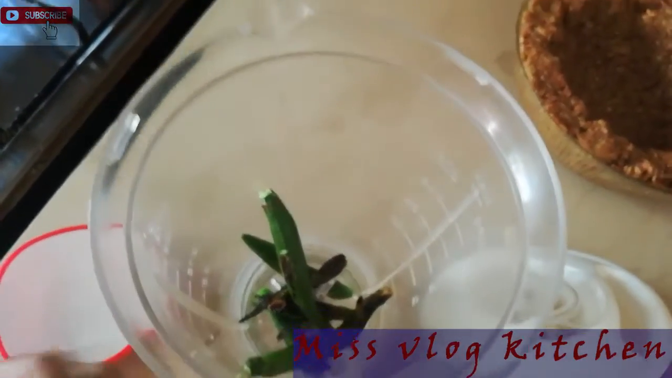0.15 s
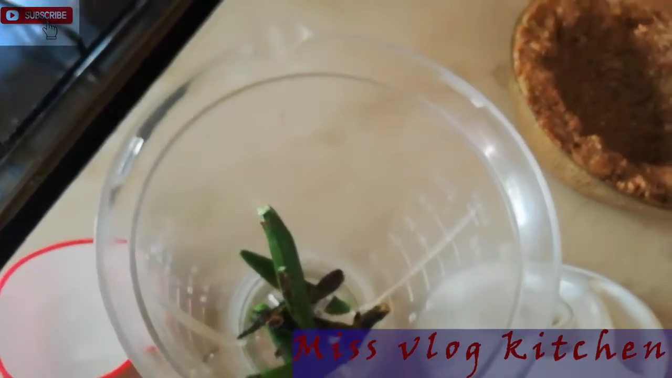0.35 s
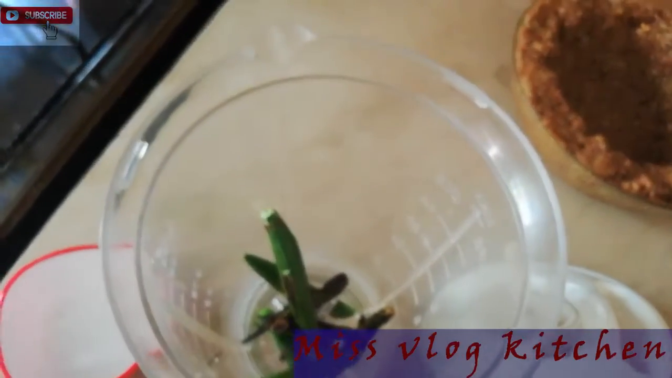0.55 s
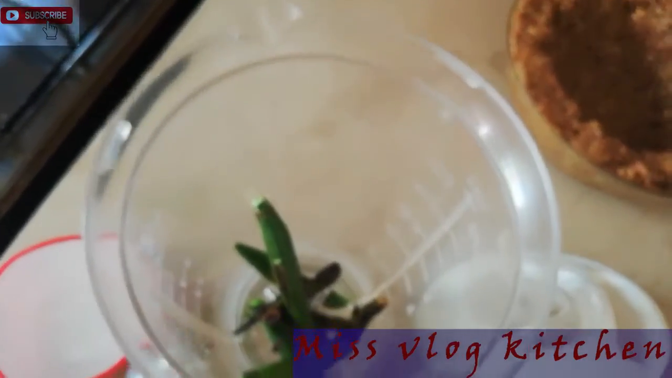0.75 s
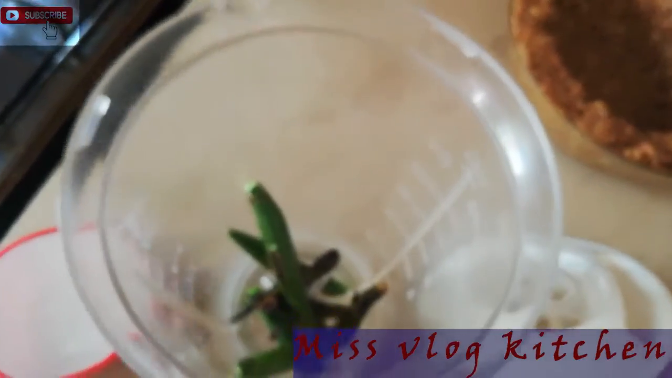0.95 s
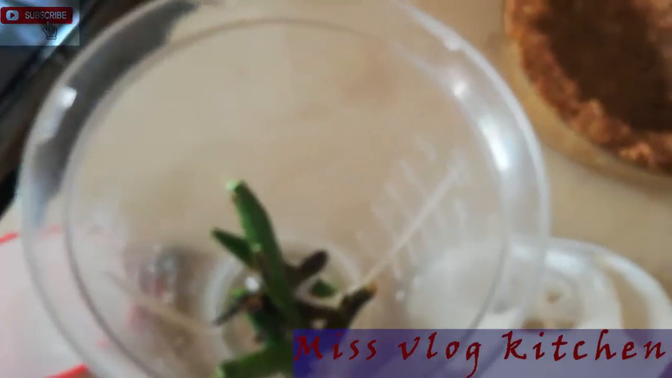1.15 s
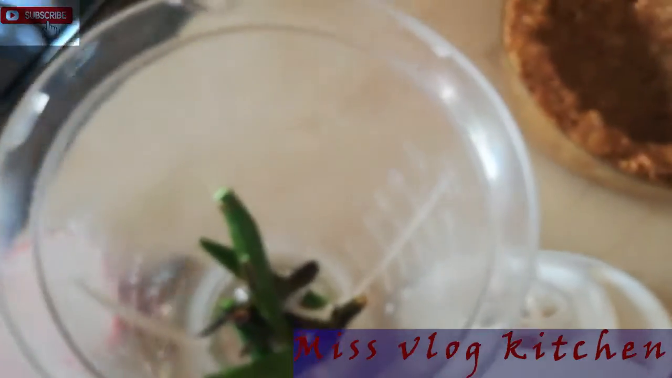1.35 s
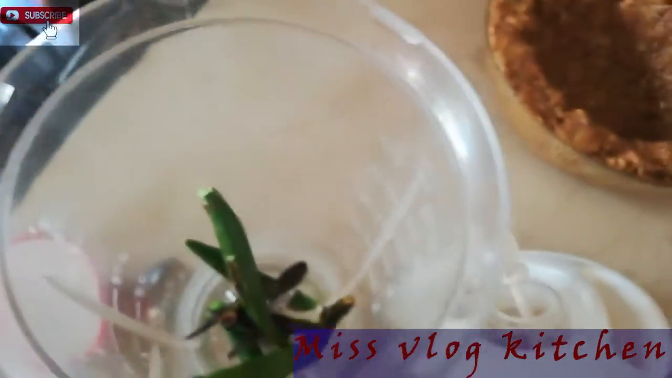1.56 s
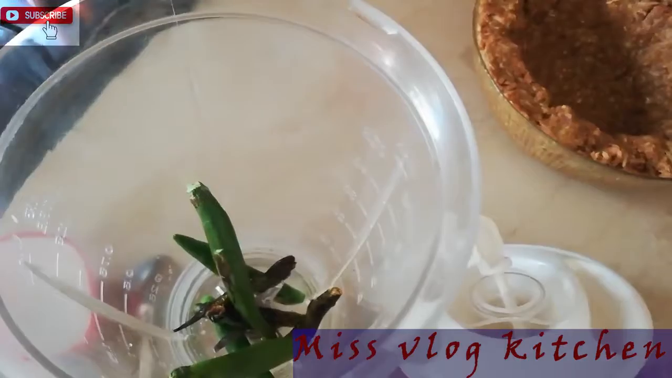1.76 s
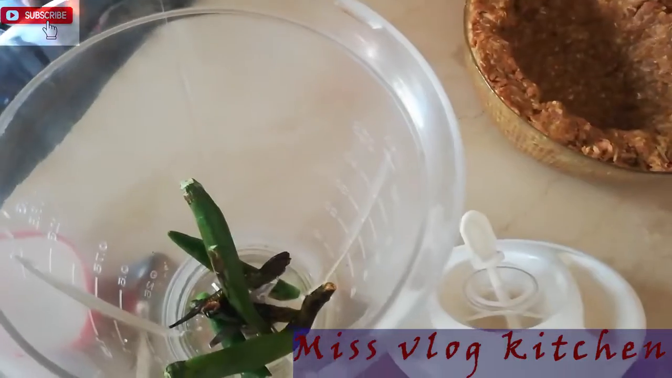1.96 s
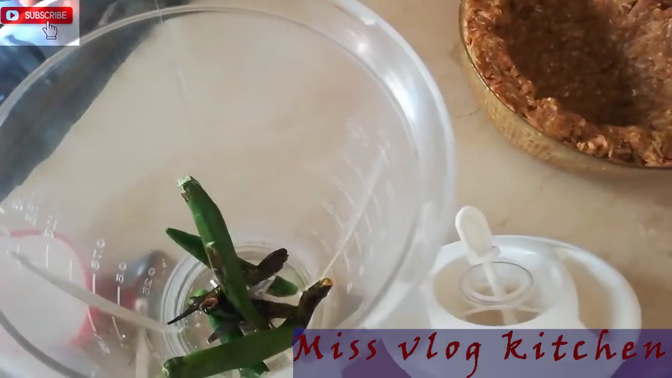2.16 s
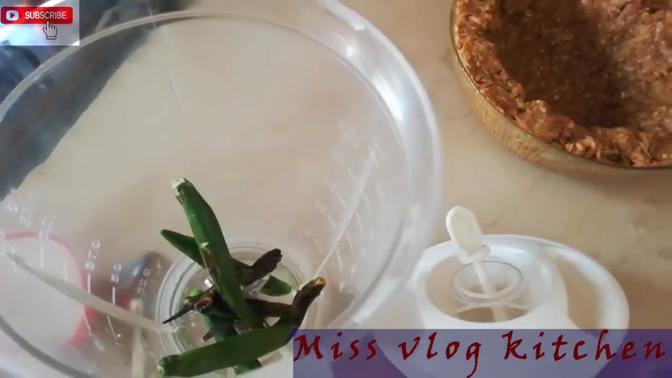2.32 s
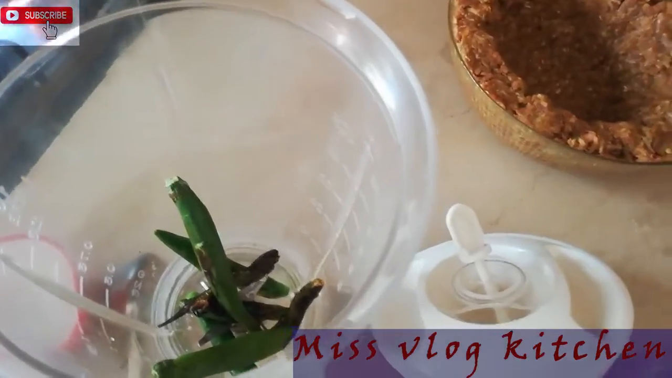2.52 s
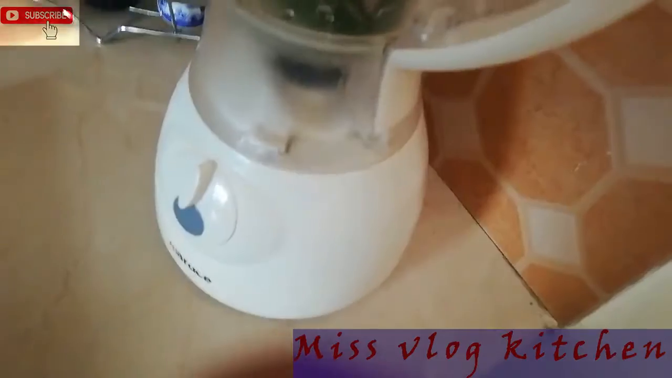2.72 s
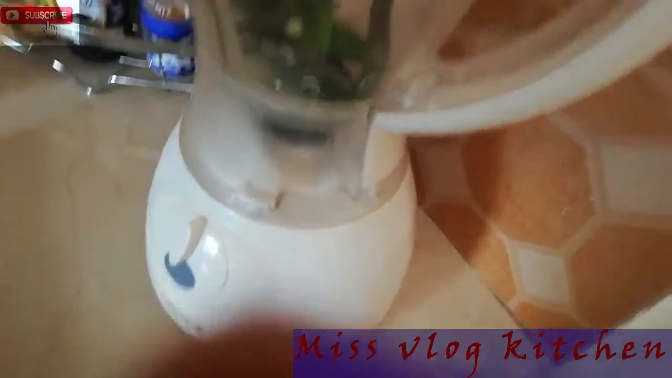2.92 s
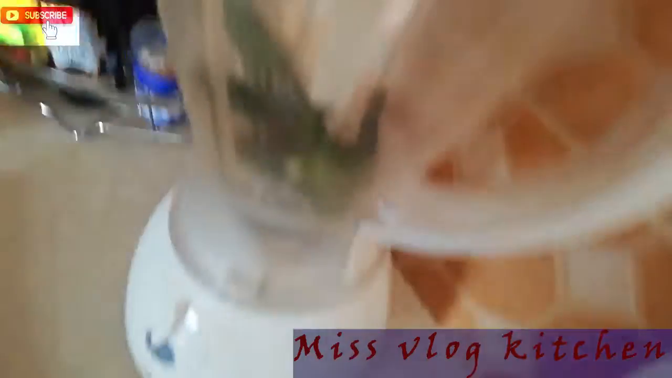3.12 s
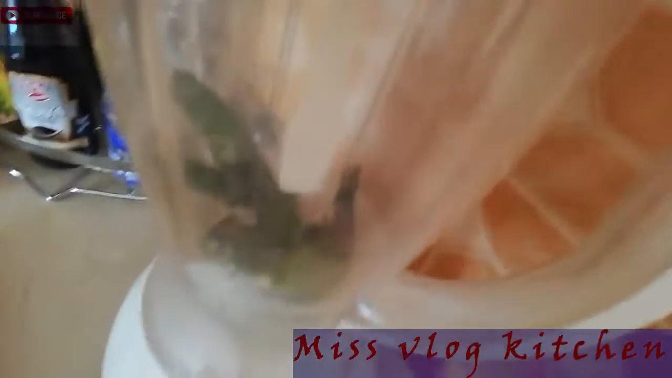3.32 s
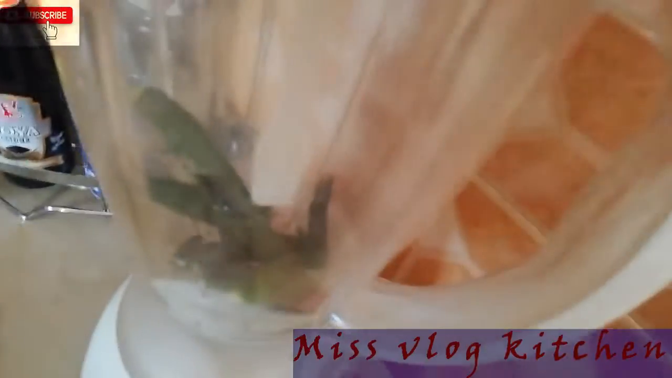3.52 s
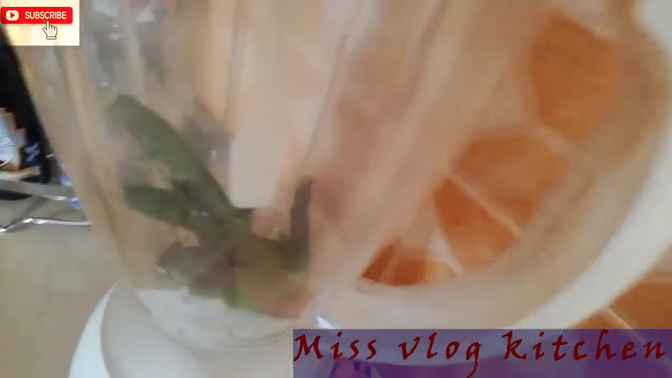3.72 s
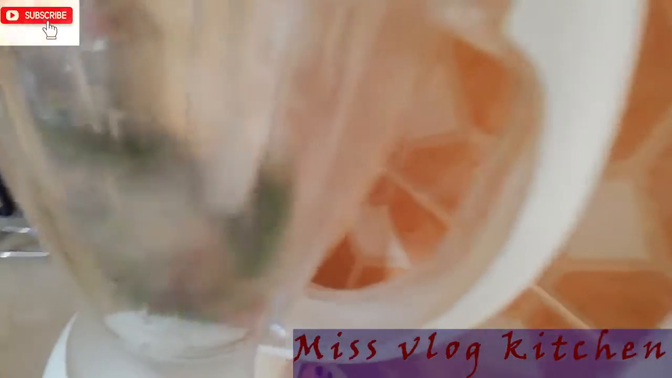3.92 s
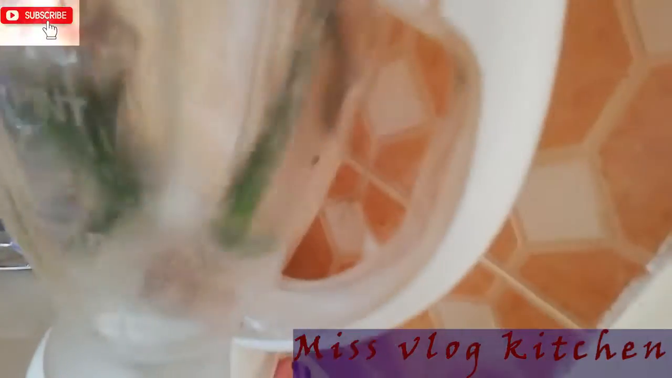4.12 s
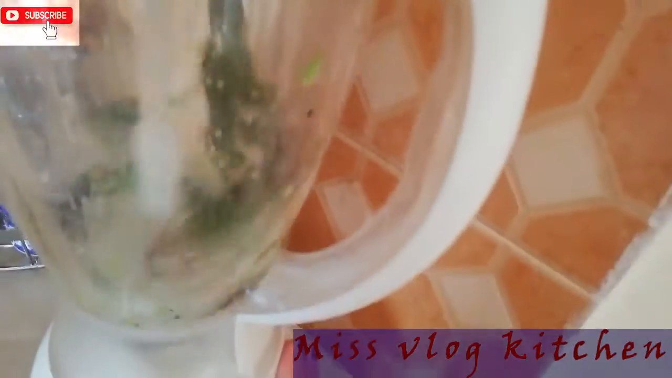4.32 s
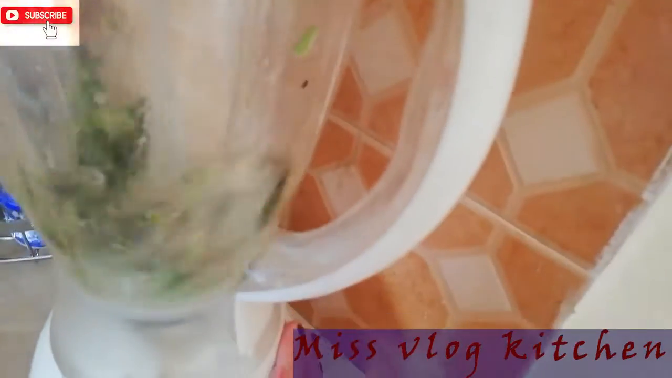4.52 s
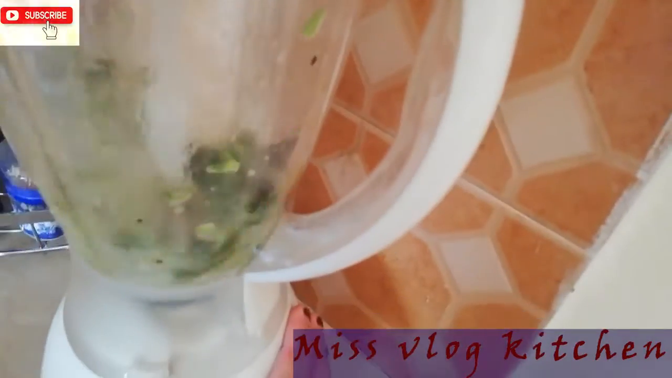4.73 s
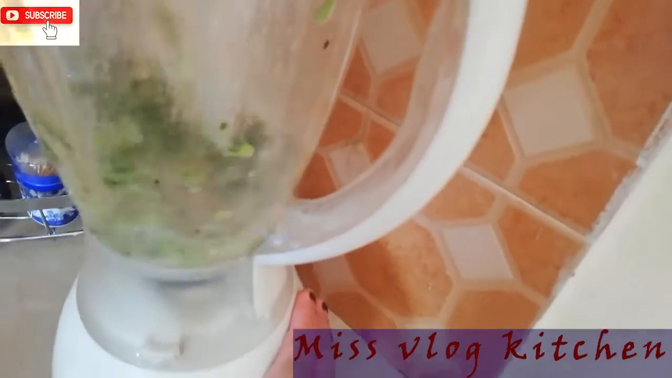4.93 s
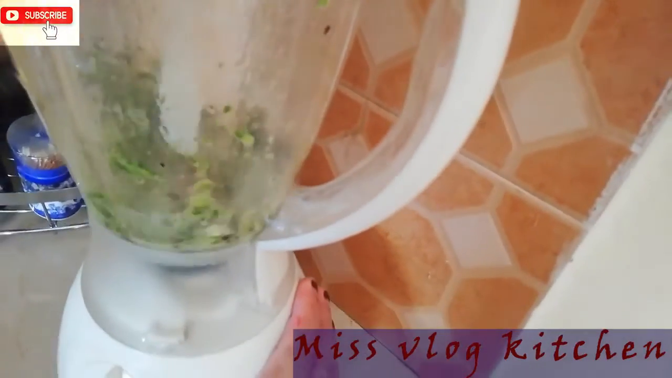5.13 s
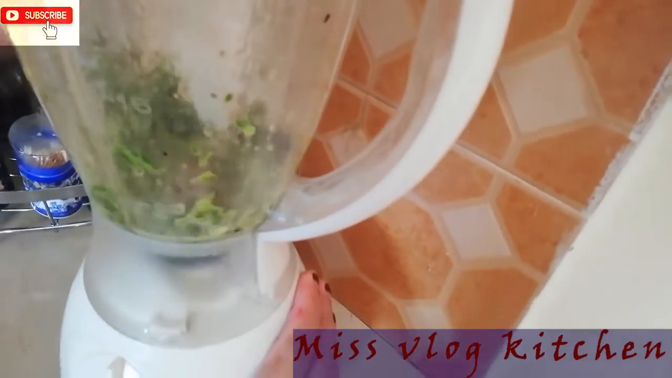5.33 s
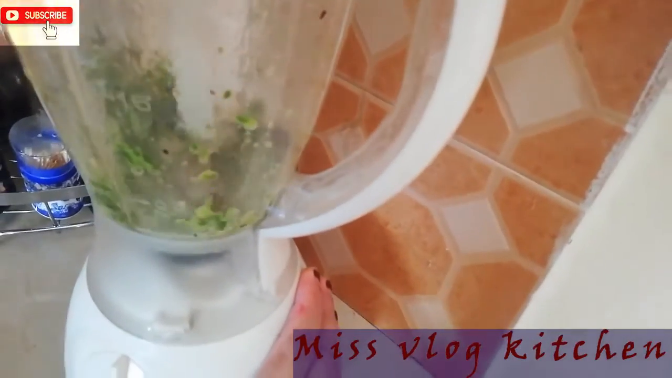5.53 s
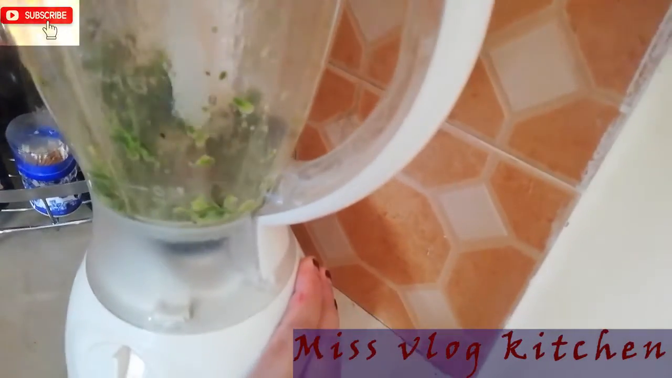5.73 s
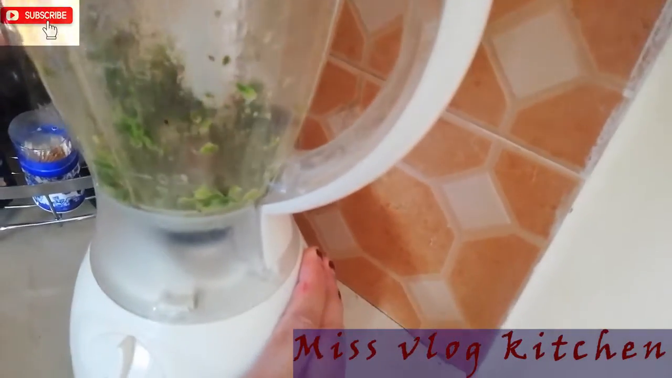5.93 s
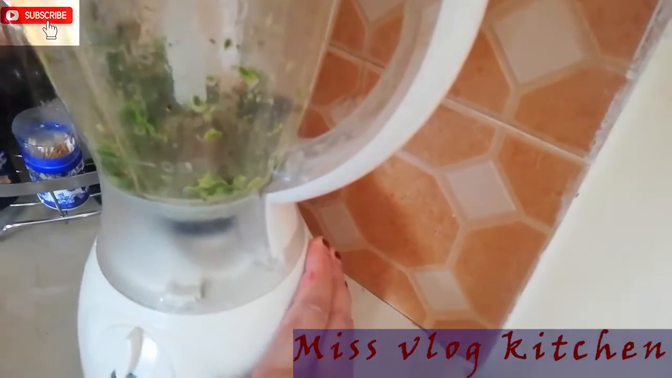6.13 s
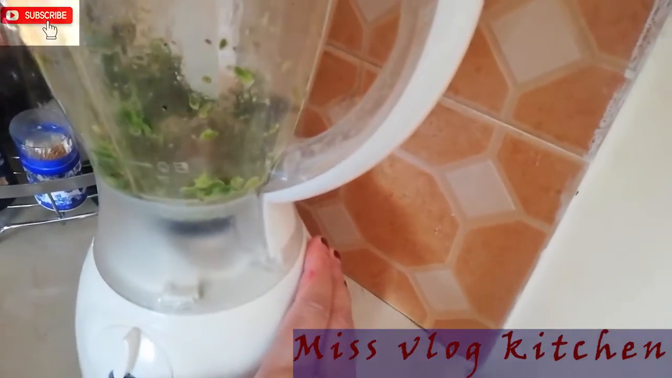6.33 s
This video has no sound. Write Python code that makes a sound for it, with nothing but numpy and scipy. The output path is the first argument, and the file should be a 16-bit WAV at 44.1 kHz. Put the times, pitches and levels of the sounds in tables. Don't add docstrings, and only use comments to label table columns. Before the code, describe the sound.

A quiet kitchen with low, wavering fridge hum and soft room air, heard close in stereo, right side nearer. At 0.0 s a hollow plastic jug knock, then skin rubs and scrapes against plastic and worktop, strongest around 0.4 and 0.6 s. At 1.0 s a small steel part lands with a sharp click and tiny bounces; from 1.24 to about 1.55 s it rattles brightly with plastic knocks and settles. Faint rubbing follows until the place changes abruptly at 2.6 s, hum a little fuller, with more handling strokes to 3.8 s. At 3.92 s the blender starts with thuds, loud and rough, pieces cracking irregularly against blade and jug as speed climbs. After about 5.0 s chopping thins into a smoother, hissing, whining roar, peaking near 5.8 s. Switched off at 6.05 s, its pitch slides down, the lid buzzing, still turning at 6.37 s.

```python
import sys
import numpy as np
from scipy import signal
from scipy.fft import rfft, irfft
from scipy.io import wavfile
from scipy.ndimage import uniform_filter1d

SR = 44100
rng = np.random.default_rng(int(sys.argv[2]) if len(sys.argv) > 2 else 0)


def store_wav(level_fs):
    pcm = np.round(np.clip(np.atleast_2d(level_fs), -1, 1) * 32767)
    wavfile.write(sys.argv[1], SR, pcm.T.astype(np.int16))


def elevation(decibels):
    levels = np.asarray(decibels, float)
    return 10 ** (levels / 20)


N = 280917
T = np.arange(N) / SR
HZ = np.fft.rfftfreq(N, 1 / SR)

# start_s [s], turns_per_s [Hz]
SHAFT_SPEED = [(3.914, 142), (4.06, 182), (4.2, 193), (4.42, 201.5), (4.55, 203.4), (4.95, 212), (5.2, 216),
               (5.54, 220.5), (5.8, 225), (6.04, 222), (6.37, 155)]
# pitch_hz [Hz], first_place_db [dB], second_place_db [dB]
MAINS_HUM = [(100.8, -2.5, -0.5), (48.7, -17, -14.5), (146, -32, -6), (257, -45, -18.5), (1393, -40, -12)]
START_S, OFF_S = SHAFT_SPEED[0][0], 6.05
MOVE_S = 2.585
FULL_HZ = 226
MAINS_HZ = MAINS_HUM[0][0]


def evened(x):
    return x / np.sqrt(np.mean(x ** 2) + 1e-20)


def read(points, hz=HZ):
    f, value = np.transpose(points)
    return np.interp(np.log(hz + 1), np.log(f + 1), value)


def coloured(x, points):
    return evened(irfft(rfft(x) * elevation(read(points)), N))


def resonate(x, hz, width):
    spin = np.exp(2j * np.pi * np.cumsum(hz * np.ones(N)) / SR)
    r = np.exp(-np.pi * width / SR)
    smooth = signal.lfilter([(1 - r) ** 2], [1, -2 * r, r * r], x / spin)
    return 2 * (spin * smooth).real


def bank(x, peaks):
    return evened(sum(elevation(db) * evened(resonate(x, hz, width)) for hz, width, db in peaks))


def grit(per_s, spread_db, smooth):
    size = elevation(spread_db * np.minimum(rng.exponential(1, N), 5)) * (rng.random(N) < per_s / SR)
    clicks = evened(size * rng.choice([-1., 1.], N))
    return evened(clicks + smooth * rng.standard_normal(N))


def drift(seconds):
    size = int(seconds * SR)
    once = uniform_filter1d(rng.standard_normal(N), size=size)
    return evened(uniform_filter1d(once, size=size))


def ring(modes, seconds=.5):
    t = T[:int(seconds * SR)]
    return sum(elevation(db - 60 * t / t60) * np.sin(2 * np.pi * hz * t) for hz, db, t60 in modes)


def train(blows):
    out = np.zeros(N)
    for s, db in blows:
        out[round(s * SR)] += elevation(db)
    return out


def answer(drive, response):
    return signal.fftconvolve(drive, response)[:N]


def shaft():
    # start_s [s], share [0-1]
    pieces = [(3.92, 0.98), (4.9, 0.97), (5.2, 0.17), (6.37, 0.17)]
    steady = np.interp(T, *np.transpose(SHAFT_SPEED))
    speed = steady * (1 + 0.0027 * drift(0.015))
    turns = 2 * np.pi * np.cumsum(speed) / SR
    load = np.clip(np.interp(T, *np.transpose(pieces)), 0, 1)
    coast = np.clip((T - OFF_S) / 0.03, 0, 1)
    return steady, speed, turns, load, coast


def shaft_tones(steady, speed, turns, coast):
    orders = [2, 3, 4, 5, 6, 7, 8, 9, 10, 13, 20, 24]
    # power_db [dB], coast_db [dB]
    order_levels = [(-47, -49), (-44, -49), (-34, -45), (-36, -38), (-38.5, -36.5), (-35.5, -46),
                    (-40, -44), (-33.5, -43), (-36, -34), (-38, -40), (-55, -59), (-42.5, -53)]
    lost_hz = FULL_HZ - steady
    held_db = np.maximum(FULL_HZ - speed, 0) * 0.37
    jammed = np.clip(.5 - (T - 4.38) / 0.052, 0, 1)
    tone_db = -31.5 - (0.17 - 0.04 * coast) * lost_hz - 12 * jammed + 1.36 * drift(0.027)
    buzz_db = -38 - 0.3 * lost_hz - 7 * coast
    out = elevation(tone_db) * np.sin(turns) + elevation(buzz_db) * np.sin(2 * np.pi * MAINS_HZ * T)
    for k, (power_db, coast_db) in zip(orders, order_levels):
        swell_db = 4 * np.exp(-((k * steady - 1040) / 550) ** 2)
        order_db = (1 - coast) * (power_db - held_db) + coast * (coast_db + swell_db)
        out += elevation(order_db + 2.5 * drift(0.035)) * np.sin(k * turns + 6 * rng.random())
    return np.sqrt(2) * out


def brushes(speed, load, coast):
    bar_orders = [36, 37, 42, 48, 60]
    # level_db [dB], width_hz [Hz]
    bar_levels = [(-39, 84), (-39, 150), (-41, 120), (-37, 82.6), (-46, 130)]
    noise = rng.standard_normal(N)
    whine = sum(elevation(db) * evened(resonate(noise, k * speed, width))
                for k, (db, width) in zip(bar_orders, bar_levels))
    throb = 1 + .5 * np.sin(2 * np.pi * MAINS_HZ * T)
    spark_db = 5.5 - 23 * load - 16 * coast
    return elevation(spark_db) * throb * whine


def lid_buzz(strikes, steady, coast):
    nearness = np.exp(-((steady - 171.2) / 14.5) ** 2)
    return elevation(-36.5) * nearness * coast * evened(resonate(strikes, 3470, 188))


def chopping(steady, turns, load, coast):
    # peak_s [s], level_db [dB], half_length_s [s]
    bites = [(3.936, 9, 0.054), (4.017, 8, 0.058), (4.162, 11.5, 0.098), (4.233, 9, 0.026),
             (4.355, 5, 0.066), (4.457, 9, 0.0357), (4.511, 9.5, 0.043), (4.6, 6.5, 0.066),
             (4.681, 9.5, 0.056), (4.757, 9.5, 0.0294), (4.84, 8, 0.075), (4.936, 3.5, 0.072),
             (5.025, 6, 0.044), (5.07, 1.5, 0.025), (5.266, 2.5, 0.054), (5.42, 2, 0.042), (6.297, 4, 0.16)]
    # start_s [s], peak_db [dB]
    single_cuts = [(3.9193, -23), (3.9243, -14), (3.9463, -15), (3.983, -5), (4.0246, -15), (4.0396, -6.5),
                   (4.086, -9), (4.1304, -6.5), (4.1927, -11), (4.224, -8), (4.296, -19), (4.3094, -8),
                   (4.331, -7), (4.363, -7.5), (4.4362, -18), (4.4526, -8.5), (4.494, -8), (4.5564, -10),
                   (4.5795, -8), (4.6601, -15), (4.6712, -7), (4.7163, -11), (4.7528, -10), (4.8211, -10),
                   (4.8835, -9), (4.9181, -10.5), (4.99, -19), (5.0049, -13), (5.0528, -6), (5.0734, -8),
                   (5.1944, -19), (5.2762, -20), (5.3345, -29), (5.376, -12), (5.4204, -6), (5.4853, -20)]
    # free_db [dB], slow_db [dB per lost turn a second], bite_share [1], coast_db [dB]
    layers = [
        (-21, 0.0055, 0.581, -3.5),
        (-28.5, 0.0134, 0.85, -1.5),
        (-24.5, 0.1249, 0.68, 2),
    ]
    brake_levels = [-2.5, -1, -2.5]
    # pitch_hz [Hz], level_db [dB per Hz]
    housing_spectrum = [(350, -35.5), (600, -12), (707, -18), (903, -7.5), (1430, -5.5), (1540, -5),
                        (2090, -3), (2400, -9), (2700, -7.5), (3510, -19), (5940, -120)]
    # pitch_hz [Hz], width_hz [Hz], level_db [dB]
    housing_rings = [(911, 68, -6), (1028, 170, -7.5), (1569, 47, -0.5), (2022, 150, -0.5),
                     (2146, 190, -2.5), (2585, 53, -11), (2842, 140, -9.5)]
    # pitch_hz [Hz], level_db [dB per Hz]
    blade_spectrum = [(1410, -38.5), (2400, -17.5), (2880, -8.5), (3140, -4), (3890, -0.5), (4700, -3),
                      (5800, -8.5), (6600, -16), (13200, -88)]
    # pitch_hz [Hz], level_db [dB per Hz]
    hiss_spectrum = [(3120, -41), (5300, -8.5), (6980, -3), (8030, 0.5), (8780, -0.5), (10500, -2),
                     (13000, -9), (15200, -19), (16200, -33)]
    # pitch_hz [Hz], level_db [dB per Hz]
    rumble_spectrum = [(20, -36), (45, -35), (70, -14), (130, -3), (230, -9), (300, -13), (360, -3.5),
                       (450, -11.5), (700, -10.5), (1000, -9), (2000, -80)]

    lost_hz = FULL_HZ - steady
    bite_db = sum(db * np.clip(1 - abs(T - s) / half, 0, 1) for s, db, half in bites)
    body_db, blade_db, hiss_db = [
        free_db - slow * lost_hz + share * bite_db + coast_db * coast + brake_db * load
        for (free_db, slow, share, coast_db), brake_db in zip(layers, brake_levels)]

    surge = elevation(0.35 * load * drift(0.019)) * (1 + .12 * np.sin(4 * turns))
    churn = grit(5000, 2.7, 1.84) * surge
    cuts = answer(train(single_cuts), elevation(5.5 - 60 * T[:4000] / .07))
    strikes = churn * (1 + cuts)
    dulled = churn * (1 + 0.42 * cuts)

    ringing = load + 0.14 * (1 - load)
    body = evened(coloured(dulled, housing_spectrum) + 0.64 * ringing * bank(dulled, housing_rings))
    hiss = coloured(.5 * strikes + rng.standard_normal(N), hiss_spectrum)
    rumble = coloured(0.39 * strikes + rng.standard_normal(N), rumble_spectrum)
    shake_db = -20 + 12 * np.exp(-abs(T - START_S) / 0.12)
    out = elevation(body_db) * (body + elevation(shake_db) * rumble)
    out += elevation(blade_db) * coloured(strikes, blade_spectrum)
    out += elevation(hiss_db) * hiss + lid_buzz(strikes, steady, coast)
    return np.clip((T - START_S) / 0.0079, 0, 1) ** 2 * out


def blender():
    steady, speed, turns, load, coast = shaft()
    motor = shaft_tones(steady, speed, turns, coast) + brushes(speed, load, coast)
    return (T > START_S) * motor + chopping(steady, turns, load, coast)


def swells(peaks, dbs, t60s, rest_db):
    power = elevation(2 * rest_db) * np.ones(N)
    for s, db, t60 in zip(peaks, dbs, t60s):
        fall_db = 60 * np.maximum((T - s) / t60, (s - T) / (0.18 * t60))
        power += elevation(2 * (db - fall_db)) * ((T < MOVE_S) == (s < MOVE_S))
    return np.sqrt(power) * (T < START_S)


def rubbing():
    # pitch_hz [Hz], level_db [dB per Hz]
    skin_spectrum = [(2650, -54), (4500, -20), (5710, -12), (6560, -2.5), (7290, 0), (8200, 2.5), (9460, 2),
                     (12200, -9.5), (16000, -36)]
    # pitch_hz [Hz], width_hz [Hz], level_db [dB]
    drag_peaks = [(992, 130, -1.5), (1280, 540, 8.5), (1727, 310, 5.5)]
    # start_s [s], peak_db [dB]
    lettings_go = [(0.3506, -25), (0.4174, -15), (0.626, -21), (0.9035, -38), (1.8961, -35), (2.5416, -34),
                   (3.1073, -43), (3.3682, -14), (3.549, -28.5), (3.6444, -27), (3.4239, -24.5),
                   (3.6982, -42)]
    # peak_s [s], skin_db [dB], wall_db [dB], wall_hz [Hz], t60_s [s]
    strokes = [(0.004, -50, -36, 3230, 0.24), (0.358, -44, -32, 2850, 0.24),
               (.426, -39.5, -32.5, 2960, 0.87), (.638, -31.5, -41, 4740, 0.29),
               (.75, -48, -50.5, 3320, 7.2), (.9, -60, -41, 4730, 0.17), (1.094, -48, -40.5, 3900, 0.31),
               (1.226, -54, -36.5, 3510, 0.15), (1.6, -42, -41.5, 3350, 0.17), (1.82, -55, -57, 2810, 0.6),
               (1.903, -39, -52, 5580, 0.4), (2.077, -47.5, -59, 3810, 0.5),
               (2.426, -43, -56.5, 3500, 1.25), (2.55, -54, -70, 4200, 0.19),
               (2.87, -62, -60.5, 4900, 0.68), (2.96, -41, -40, 4720, 0.12),
               (3.115, -49, -35.5, 5700, 0.39), (3.205, -48, -47, 3520, 0.55),
               (3.33, -43.5, -40.5, 3500, 1.84), (3.382, -47, -42.5, 5500, 1.3),
               (3.429, -47, -34, 3220, 0.26), (3.65, -50, -44, 5200, 1.5), (3.705, -50, -35.5, 3020, 0.62),
               (3.8, -43.5, -43.5, 3250, 6.7)]
    # peak_s [s], level_db [dB], t60_s [s]
    drags = [(0.004, -35.5, 0.41), (.33, -62, .4), (0.427, -41, 0.2), (.725, -40, 0.36), (.8, -42, 0.85),
             (.9, -39, 0.21), (1.09, -68, .9), (1.88, -54, 1.9), (2.084, -62.5, 0.29), (2.4, -56, 0.59),
             (2.89, -55, .6), (2.96, -54, .15), (3.2, -53, 1.3), (3.34, -48.5, 1.74), (3.71, -52, 4.1),
             (3.9, -52, 0.87)]
    rest_levels = [-66, -78, -64]

    slips = grit(6000, 2.6, 0.47)
    skin = coloured(slips, skin_spectrum)
    drag = bank(grit(1500, 6.1, 1.0), drag_peaks)
    jolt = answer(train(lettings_go), elevation(-14.5 - 60 * T[:4000] / 0.073))
    out = jolt * (skin + 0.49 * evened(resonate(slips, 5060, 2700)))

    s, skin_db, wall_db, wall_hz, t60 = np.transpose(strokes)
    grip_hz = wall_hz[np.clip(np.searchsorted(s - .04, T) - 1, 0, None)]
    wall = evened(resonate(slips, uniform_filter1d(grip_hz, size=1500), 2900))
    wall = wall + 1.13 * evened(resonate(slips, 4370, 4600))
    out += swells(s, skin_db, t60, rest_levels[0]) * skin
    out += swells(s, wall_db - 6.0, t60 / 1.07, rest_levels[1]) * wall
    return out + swells(*np.transpose(drags), rest_levels[2]) * drag


def knocks():
    # start_s [s], peak_db [dB], pitch_hz [Hz], treble_db [dB]
    plastic = [(0.01, -12.5, 1740, -24), (0.905, -28, 1620, -28), (1.243, -13.5, 3800, -19),
               (1.262, -19, 2940, -22), (1.349, -21, 3200, -22), (1.605, -30.5, 3470, -24),
               (3.426, -37, 2900, -20), (3.547, -35, 1410, -20)]
    # start_s [s], level_db [dB], pitch_hz [Hz], t60_s [s]
    thuds = [(1.253, -33, 45.7, 0.1), (1.256, -33, 197, 0.06), (1.345, -39, 55.4, 0.072),
             (1.349, -20, 1090, .02), (1.349, -35, 300, 0.046), (2.954, -44, 148, .04),
             (3.927, -25, 320, 0.029), (3.939, -20, 145, 0.084), (4.091, -20.5, 137, 0.071),
             (5.86, -43, 60, .08), (3.68, -46, 265, 0.54), (3.32, -54, 790, 0.6)]
    # pitch_hz [Hz], level_db [dB], t60_s [s]
    jug_modes = [(202.7, -2, 0.37), (1184, -10, 0.25), (1480, 1, 0.22), (1740, -17, 0.2), (2900, -12, 0.12),
                 (3950, -12, 0.093)]
    out, t = np.zeros(N), T[:3000]
    for s, db, hz, treble_db in plastic:
        tick = np.diff(rng.standard_normal(len(t) + 2), 2) * elevation(treble_db - 3.0 - 60 * t / 0.0074)
        tone = ring([(hz, -1, .022), (1.66 * hz, -6, .015)])[:len(t)]
        out[round(s * SR):][:len(t)] += elevation(db) * (tick + tone)
    quarter = SR // 4
    for s, db, hz, t60 in thuds:
        thud = ring([(hz, db, t60)])[:quarter] * np.minimum(T[:quarter] / 0.0021, 1)
        out[round(s * SR):][:quarter] += thud
    return out + elevation(-34.0) * answer(train([(plastic[0][0], 0)]), ring(jug_modes))


def steel():
    mode_hz = [3170, 3380, 3520, 4590, 5750, 7270, 7670, 7800, 8915, 9125, 9530, 10512, 12380, 13100, 13380,
               13710]
    # drop_db [dB], rattle_db [dB], t60_s [s]
    mode_levels = [(-13.5, -20.5, 0.21), (-15, -15, 0.2), (-27.5, -14, 0.12), (-2, -2.5, 0.061),
                   (-9, -12, 0.11), (-12, -8, 0.35), (-20.5, -9, 0.092), (-17, -9, 0.084), (-32, 2, 0.1),
                   (-25, -14.5, 0.11), (-32, 1, 0.057), (-26, 6.5, 0.044), (-25, -11, 0.097),
                   (-17, 0, 0.0394), (-19, -7, 0.16), (-31, -0.5, 0.075)]
    # start_s [s], blow_db [dB]
    drop_blows = [
        (.9995, -20.5),
        (1.019, -36),
        (1.034, -40),
    ]
    # start_s [s], blow_db [dB]
    rattle_blows = [(1.2425, -10.5), (1.2553, -13.5), (1.266, -8.5), (1.295, -14), (1.3052, -11),
                    (1.3296, -18), (1.3351, -9), (1.345, -19), (1.366, -20), (1.374, -19), (1.395, -16),
                    (1.416, -15.5), (1.427, -15.5), (1.441, -19), (1.452, -19), (1.466, -23), (1.477, -24),
                    (1.494, -23), (1.516, -32), (1.528, -22.5)]
    # start_s [s], strength_db [dB], touches_per_s [1/s]
    rattle = [(1.24, -21.5, 1200), (1.26, -17.5, 460), (1.282, -26, 720), (1.332, -20, 550),
              (1.512, -30, 830), (1.57, -50, 600)]
    # pitch_hz [Hz], level_db [dB per Hz]
    crack_spectrum = [(710, -16), (1200, -15), (2600, -8.5), (3660, -1), (5200, -9), (6440, -17),
                      (8820, 0.5), (11800, -22), (13700, -14), (16000, -48.5)]
    # pitch_hz [Hz], level_db [dB], t60_s [s]
    clack_modes = [(3810, -15, 0.015), (3250, -23, .016), (11000, -16, .01)]

    s, strength, rate = np.transpose(rattle)
    strength_db = np.interp(T, s, strength, -120, -120)
    per_s = np.interp(T, s, rate, 0, 0)
    touches = (rng.random(N) < per_s / SR) * elevation(strength_db - 1.5 + 1.5 * rng.standard_normal(N))
    drop, blows = train(drop_blows), train(rattle_blows)
    out = np.zeros(N)
    for hz, (drop_db, rattle_db, t60) in zip(mode_hz, mode_levels):
        where = rng.uniform(-0.96, 1, N)
        shaken = 0.81 * blows + touches * (np.sign(where) * 0.77 + 0.55 * where)
        drive = elevation(drop_db) * drop + elevation(rattle_db - 9.5) * shaken
        out += answer(drive, ring([(hz, 0, t60)]))
    hits = elevation(8.5) * drop + elevation(-19) * blows + elevation(-16.5) * touches
    t = T[:3000]
    contact = answer(hits, elevation(-60 * t / 0.013) + elevation(-24.5 - 60 * t / 0.33))
    out += contact * coloured(rng.standard_normal(N), crack_spectrum)
    out += answer(blows, ring(clack_modes))
    return signal.lfilter(*signal.butter(2, 1500, "high", fs=SR), out)


def kitchen(near):
    # pitch_hz [Hz], level_db [dB per Hz]
    air_spectrum = [(15, -20), (35, -21), (60, -15), (75, -5), (150, -11.5), (300, -10), (450, -12),
                    (560, -19), (850, -12.5), (1200, -14), (1900, -16), (3100, -22.5), (7000, -32),
                    (16000, -43)]
    power_db = 10 * np.log10(abs(uniform_filter1d((near ** 2).mean(0), size=800)) + 1e-12)
    fall = 57 * T
    held_db = np.maximum.accumulate(power_db + fall) - fall
    over_db = uniform_filter1d(np.maximum(held_db + 32.5, 0), size=600)
    hum = np.zeros(N)
    for hz, first_db, second_db in MAINS_HUM:
        level_db = np.where(T < MOVE_S, first_db, second_db) + 2.2 * drift(0.21)
        phase = 2 * np.pi * np.cumsum(hz + .5 * drift(0.094)) / SR
        hum += elevation(level_db) * np.sqrt(2) * np.sin(phase)
    air = coloured(rng.standard_normal(N), air_spectrum) * elevation(0.64 * drift(0.014))
    return elevation(-49 - 0.674 * over_db) * hum + elevation(-52 - 0.058 * over_db) * air


def walls(t60):
    count = int(t60 * SR) // 20
    taps = np.zeros(20 * count)
    taps[20 * np.arange(count) + rng.integers(0, 20, count)] = rng.choice([-1., 1.], count)
    taps *= elevation(-60 * T[:len(taps)] / t60)
    return taps / np.linalg.norm(taps)


def scattered(x):
    z = signal.stft(x, nperseg=256, noverlap=192)[2]
    a, b = uniform_filter1d(rng.standard_normal((2, *z.shape)), size=5, axis=2)
    turned = z * np.exp(1j * np.arctan2(a, b))
    return signal.istft(turned, nperseg=256, noverlap=192)[1][:N] * 0.77


def ports(x, left_db, wet_db, t60):
    # pitch_hz [Hz], phase [radians]
    left_lead = [(0, 0), (340, -0.8), (1030, -6.6), (1550, -6.5), (2070, -8.0), (3270, -12.8),
                 (4130, -14.3), (5000, -11.8), (5510, -13.5), (5940, -14.6), (6290, -12.6), (15000, -12.6),
                 (15300, -12.6), (15900, -12.5)]
    # pitch_hz [Hz], share [0-1]
    likeness = [(60, 1), (220, 0.92), (350, 0.76), (1000, 0.24), (2500, 0.4), (4500, 0.1), (6500, 0.57),
                (15000, 0.67)]
    # pitch_hz [Hz], level_db [dB]
    left_level = [(60, 2), (110, -1), (200, 3.5), (380, -1), (700, -1), (1290, 2), (2380, -4), (4400, 3.5),
                  (8120, 0.5), (15000, -11)]
    x = x + elevation(wet_db) * answer(x, walls(t60))
    near, other = rfft(x), rfft(scattered(x))
    alike = np.clip(read(likeness), 0, 1)
    gain = elevation(read(left_level) + left_db)
    lead = np.interp(HZ, *np.transpose(left_lead))
    far = gain * (alike * np.exp(1j * lead) * near + np.sqrt(1 - alike ** 2) * other)
    middle = np.sqrt(1 + gain ** 2 + 2 * gain * alike * np.cos(lead)) / 2
    return irfft(np.array([far, near]) / middle, N)


def scene():
    # start_s [s], left_gain_db [dB]
    hand_path = [(0, 0), (2.58, -5), (2.6, 1), (3.05, 5), (3.3, -1.5), (3.9, 0)]
    hand = ports(rubbing(), 0.37, -8.5, 0.073) + ports(knocks(), -1, -5, 0.33)
    hand[0] *= elevation(np.interp(T, *np.transpose(hand_path)))
    near = ports(blender(), -0.91, -16.5, 0.18) + hand + ports(steel(), -7.5, -8, 0.24)
    return near + ports(kitchen(near), 0.84, -16.5, 0.029)


def low_pass(x):
    return signal.sosfilt(signal.butter(12, 15950, fs=SR, output="sos"), x)


def record(dry):
    ceiling = .96
    mix = ceiling * np.tanh(dry / ceiling)
    return low_pass(mix)


dry = scene()
out = record(dry)
store_wav(out)
```